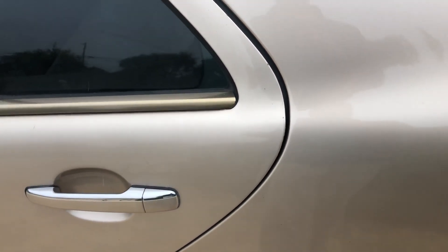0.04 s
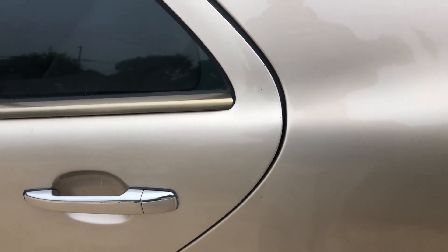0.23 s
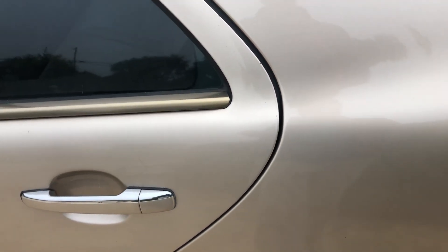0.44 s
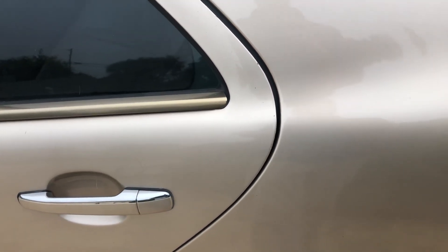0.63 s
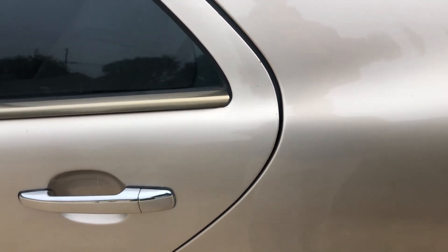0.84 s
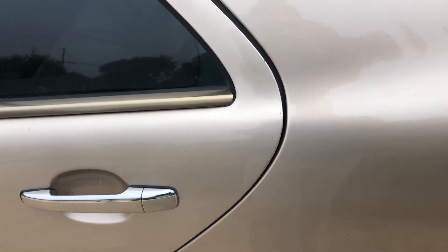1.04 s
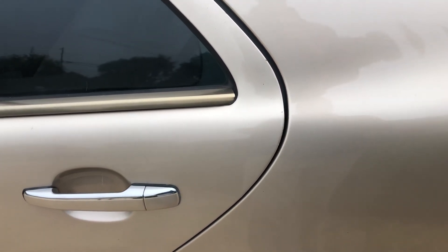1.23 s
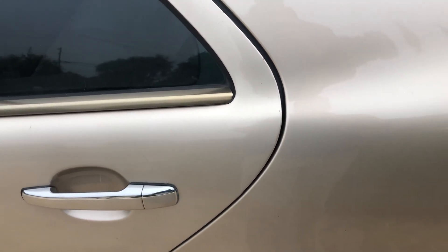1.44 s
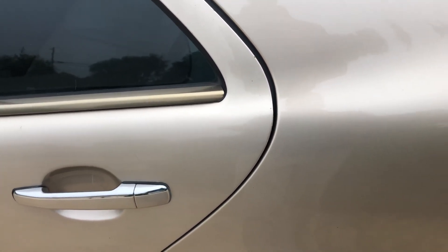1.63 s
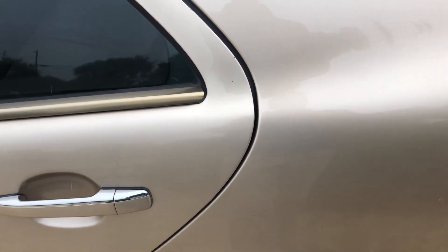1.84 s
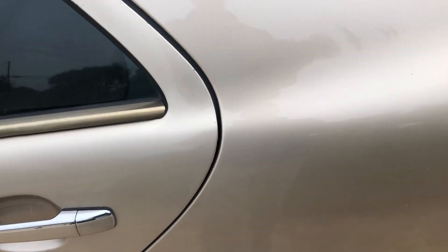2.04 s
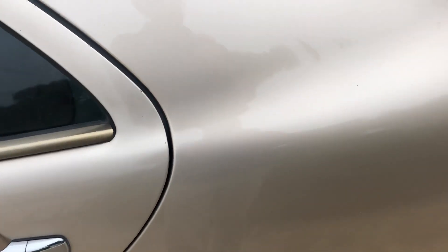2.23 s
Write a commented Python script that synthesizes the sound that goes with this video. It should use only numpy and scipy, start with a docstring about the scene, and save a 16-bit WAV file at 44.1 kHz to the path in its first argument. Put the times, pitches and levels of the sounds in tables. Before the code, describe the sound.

Hard clicking and tapping on a parked car's door trim over very faint distant traffic rumble

```python
"""Faint clicks and scrapes over far traffic rumble, soon a loud sharp click, then more clicks, knocks and taps.
Outdoors beside a parked car, small hard parts (trim, plastic, grit) click and scrape under a hand.
A click, knock or tap is one sharp slip with weak after-slips; a scrape is a dense run of tiny slips.
The slips ring a few stiff modes, and a short echo follows. Traffic and insects are filtered noise:
a rumble and a hiss near 10 kHz. A distant bird whistles two faint gliding tones."""
import sys
import numpy as np
from scipy import signal
from scipy.fft import rfft, irfft, next_fast_len
from scipy.io import wavfile
from scipy.ndimage import map_coordinates

SR = 44100
rng = np.random.default_rng(int(sys.argv[2]) if len(sys.argv) > 2 else 0)


def master_out(mix):
    """Clip the mix to full scale and print it as 16-bit PCM to the path in sys.argv[1]."""
    frames = np.transpose(np.atleast_2d(mix))
    ceiling = np.clip(frames, -1, 1)
    pcm = np.round(ceiling * 32767).astype(np.int16)
    wavfile.write(sys.argv[1], SR, pcm)


def linear_from_db(decibels):
    """Turn decibels (scalar or array-like) into linear amplitude factors; 0 gives 1."""
    return 10 ** (np.asarray(decibels, float) / 20)


N = 101430  # length of the scene in samples

# Colour of traffic and air, before its overall level is set: pitch_hz, relative_level_per_hz_db
AIR_COLOUR = [(28, -55), (50, -1.5), (70, -3), (120, -1), (230, -9.5), (400, -18.5), (800, -23.5),
              (1600, -32.5), (2600, -33), (4500, -36.5), (8000, -42), (15500, -43.5)]
AIR_DB = -57.5
# Bands of a far engine: pitch_hz, half_width_hz, level_db
ENGINE_BANDS = [(96, 14.4, -59.5), (182.6, 9.1, -71)]
INSECT_HZ, INSECT_HALF_WIDTH_HZ, INSECT_DB = 9730, 220, -87
# Notes of a distant bird: start_s, length_s, first_pitch_hz, last_pitch_hz, level_db
BIRD_NOTES = [(1.27, 0.11, 3000, 3170, -83), (1.43, 0.2, 2900, 2810, -81)]
BIRD_OCTAVE_DB = -11

# Soft dull taps: start_s, peak_db, lower_ring_hz, upper_ring_hz
TAPS = [(0.8637, -41, 1340, 2550), (1.374, -46, 730, 1530), (1.7005, -46.5, 1020, 2670)]
TAP_WIDTH_HZ, TAP_UPPER_DB = 200, 3
TAP_TOP_HZ, TAP_TOP_DB = 3920, -7

# Scrapes: start_s, length_s, ring_level_db, main_ring_hz, treble_over_ring_db
SCRAPES = [(0.0, 0.022, -60, 4250, -12), (0.031, 0.081, -63.5, 2950, -13), (0.0707, 0.014, -55.5, 3350, -7),
           (0.1264, 0.0093, -63, 5140, -6), (0.195, 0.22, -56, 4300.0, 2), (0.1986, 0.0084, -54, 6400, 3),
           (0.207, 0.0066, -52, 4300, 2.5), (0.218, 0.008, -42.5, 4110.0, -5), (0.23, 0.11, -55, 2770, -2),
           (0.2306, 0.0049, -35, 4200, -7), (0.2345, 0.003, -37, 2860, -18), (0.2533, 0.015, -48, 3560, -7),
           (0.2654, 0.011, -36, 2900.0, -11), (0.271, 0.0053, -35, 4240, -8),
           (0.2767, 0.0045, -48, 2800, -6), (0.289, 0.0078, -41.5, 2410, -8.5),
           (0.296, 0.017, -52.5, 2710.0, -3), (0.315, 0.0063, -47.5, 2570, -21),
           (0.329, 0.033, -57.5, 2780, -5), (0.3366, 0.0073, -48, 2570, -8.5),
           (0.38, 0.024, -68.5, 2720, -7), (0.406, 0.099, -65.5, 4170, -8.0),
           (0.4134, 0.0085, -54, 4130, -21), (0.425, 0.0059, -54.5, 4340, -6),
           (0.4518, 0.008, -56.5, 4270, 1), (0.4643, 0.0059, -61.5, 4440, 3), (0.485, 0.003, -62, 4170, -5),
           (0.9485, 0.009, -60, 2700, -1), (0.997, 0.05, -68, 2770, -12), (1.1335, 0.0081, -62.5, 2900, -5),
           (1.2292, 0.0073, -60.0, 2650, -4), (1.24, 0.0046, -63, 3700, 2),
           (1.639, 0.013, -64, 2630.0, -26), (1.664, 0.0064, -47, 2630, -2),
           (1.676, 0.017, -60.5, 2650.0, 0), (1.705, 0.033, -56.5, 4240, -10), (1.709, 0.008, -54, 4200, 4),
           (1.718, 0.008, -52, 2980, -7), (1.741, 0.07, -58.5, 4200, -12), (1.772, 0.0074, -50, 2080, 3),
           (1.781, 0.01, -48.5, 4430, -7), (1.796, 0.0039, -70, 4180, -17), (1.809, 0.19, -72, 2560, -13),
           (1.816, 0.0078, -59.5, 2500, -25), (1.8924, 0.0041, -53.5, 4200, -15),
           (2.003, 0.075, -65, 2800, -6), (2.0322, 0.0041, -48, 3340, -0.5),
           (2.1053, 0.0086, -60.5, 5730, 0.5), (2.19, 0.11, -67, 2400, -6.5)]
# Modes of the scraped panel: pitch_hz, width_hz, relative_level_db
SCRAPED_PANEL = [(2650, 450, 5), (4580, 130, -6.5), (5850, 150, -21)]
GRAINS_PER_S, GRAIN_SPREAD_DB = 3500, 3
RISE_SHARE, FALL_DB, RELEASE_S = 0.079, 10.5, 0.00091  # rise and fall count over one scrape length
CLUMPS_PER_S, CLUMP_DB = 237, 4.5
CLUMP_FULL_S = 0.04  # scrapes at least this long break up fully into clumps
SCRAPE_Q, SCRAPE_BODY_DB, SCRAPE_BROAD_DB, SCRAPE_CUT_HZ = 4.7, -8, -4, 2570

# Harder knocks on one part: start_s, ring_peak_db, treble_over_ring_db, after_slips_over_first_db
KNOCKS = [(0.9585, -30, -2, -5), (0.9593, -31, -5.5, -4.5), (1.1959, -26, 0, -6), (1.421, -33, -2, -5.5),
          (1.6247, -29.5, -3.5, -3), (1.7403, -28.5, -3.5, -5.5)]
# Modes of the knocked part: pitch_hz, width_hz, relative_level_db
KNOCKED_PART = [(720, 500, -14), (1600, 1230, -7), (2170, 510, 3), (3150, 510, 0.5), (5000, 1400, -1.5),
                (6940, 1000, -6)]
KNOCK_DIP_HZ, KNOCK_DIP_WIDTH_HZ = 3800, 900

# Clicks: start_s, ring_peak_db, main_ring_hz, treble_over_ring_db, after_slips_over_first_db
CLICKS = [(0.0822, -40.5, 4280, -11, 0.5), (0.1253, -46, 2520, -19, -7), (0.2284, -13, 4250, -7, -9),
          (0.2473, -27.5, 2720, -12, -4), (0.4394, -51, 4170, -28, -19), (0.442, -48, 4260, -26, 3),
          (0.4523, -49, 4330.0, 10.5, -13), (0.479, -50, 3600, -14, -8), (0.492, -52, 4060, -17, -17),
          (0.499, -48.5, 4200, -26, -17), (0.5954, -52.5, 3750, -15, 10), (0.6042, -44.5, 2240, -4, -11),
          (0.6465, -59, 3900, -18, -18), (0.6807, -54.5, 2880, -10, -4), (0.9952, -47, 2650.0, -14, -18),
          (1.0344, -50.5, 3030, -21, -7), (1.0976, -43.5, 2560, -25, -8), (1.142, -52, 2630.0, -12, -13),
          (1.1573, -57, 3360.0, 6, -14.0), (1.2655, -53.5, 3900, -4, 1.5), (1.3564, -54, 4070, -10, -12),
          (1.5703, -36, 2650.0, -9.5, -1.5), (1.575, -35.5, 4170, -4, -12), (1.6623, -36.5, 4220, -8, -21),
          (1.7476, -39, 3870, -15, -7), (1.7662, -47, 2860, 7, 9), (1.7934, -39.5, 4150, -18, 6),
          (1.8875, -43, 4500, -3, 2), (1.9028, -37.5, 5800, -4, -7.5), (1.9643, -47.5, 2500, -12, -6),
          (2.0155, -38, 4360, -5, 2), (2.0179, -34, 5800, -2.5, 3), (2.045, -52, 4390.0, 5, -14.0),
          (2.0614, -50.5, 2950, 10, -3), (2.1322, -53.5, 5620.0, 7, -2), (2.1874, -42, 2030, -5, 5),
          (2.2205, -38.5, 2430, 3, 1)]
# Modes of the clicking part: pitch_hz, width_hz, relative_level_db
CLICKING_PART = [(1890, 1330, -5), (2900, 1540, 2.5), (5300, 2500, -0.5), (6470, 1270, -1.5)]
CLICK_Q, CLICK_BODY_DB, CLICK_BROAD_DB = 4.83, -0.5, -9  # body and broad levels before hardness
HARDNESS_SLOPE = 0.67  # dB of body and broad sound per dB of treble

# Treble snap shared by clicks, knocks and scrapes: pitch_hz, width_hz, relative_level_db
SNAP = [(8300, 3000, 0.5), (10620, 1950, 4), (15900, 7100, -1.5)]
SNAP_SCATTER_DB = 2
AFTER_T60, SNAP_T60 = 0.028, 0.015  # seconds for the after-slips to fall 60 dB: ring, treble
DULL_HZ = 6760  # rings lose treble above this
ECHO_T60, ECHO_DB = 0.04, -17  # seconds to fall 60 dB, and level
TOP_HZ = 15730


def unit(x):
    """Scale to rms 1."""
    return x / np.sqrt(np.mean(x ** 2) + 1e-20)


def top(v):
    """Scale each row to peak 1."""
    return v / np.abs(v).max(axis=1, keepdims=True)


def columns(table):
    """Turn a table into one upright array for each column."""
    return (c[:, None] for c in np.transpose(table))


def wobble(rate):
    """A smooth random curve with rate knots a second."""
    knots = rng.standard_normal(int(N * rate / SR) + 4)
    return map_coordinates(knots, [np.arange(N) * rate / SR])


def filtered(x, response):
    """Filter x along its last axis by a complex response of frequency."""
    n = x.shape[-1]
    m = next_fast_len(n + 2048)
    return irfft(rfft(x, m) * response(np.fft.rfftfreq(m, 1 / SR)), m)[..., :n]


def peak(f, hz, width):
    """One resonance that rings after it is struck; a wider one dies sooner."""
    return 1j * f * width / (hz * hz - f * f + 1j * f * width)


def modes(table):
    """Response of a table of resonances, added with alternating sign."""
    return lambda f: sum((-1) ** k * linear_from_db(db) * peak(f, hz, width)
                         for k, (hz, width, db) in enumerate(table))


def place(s, sound):
    """Add each row of sound at its start time."""
    at = np.round(np.abs(s) * SR).astype(int) + np.arange(sound.shape[1])
    return np.bincount(at.ravel(), sound.ravel(), N + sound.shape[1])[:N]


def noise_band(hz, half_width):
    """Random noise in a narrow bell-shaped band, at rms 1."""
    return unit(filtered(rng.standard_normal(N), lambda f: np.exp(-((f - hz) / half_width) ** 2)))


def traffic():
    """Far traffic and air: broad noise, strongest in the bass."""
    hz, db = np.transpose(AIR_COLOUR)
    colour = lambda f: linear_from_db(np.interp(np.log(f + 1), np.log(hz), db, left=-80))
    return linear_from_db(AIR_DB) * unit(filtered(rng.standard_normal(N), colour))


def engine():
    """A far engine drone: narrow bands of noise, which waver by themselves."""
    return sum(linear_from_db(db) * noise_band(hz, half_width) for hz, half_width, db in ENGINE_BANDS)


def insects():
    """Insect hiss: a narrow band of high noise."""
    return linear_from_db(INSECT_DB) * noise_band(INSECT_HZ, INSECT_HALF_WIDTH_HZ)


def bird():
    """Thin gliding notes, each a sine with a weaker octave, unsteady in pitch and level."""
    t, out = np.arange(N) / SR, 0
    for s, length, first_hz, last_hz, db in BIRD_NOTES:
        progress = np.clip((t - s) / length, 0, 1)
        pitch_hz = first_hz + (last_hz - first_hz) * progress + 35 * wobble(63)
        phase = 2 * np.pi * np.cumsum(pitch_hz) / SR
        swell = np.sqrt(np.abs(np.sin(np.pi * progress))) * linear_from_db(db + 2 * wobble(70))
        tone = np.sin(phase) + linear_from_db(BIRD_OCTAVE_DB) * np.sin(2 * phase)
        out = out + np.sqrt(2) * swell * tone
    return out


def train(after_db):
    """A first slip and a dying train of weaker ones, one row for the ring and a shorter one for the treble."""
    t = np.arange(1000) / SR
    fade = linear_from_db(-60 * t / np.array([[AFTER_T60], [SNAP_T60]]))
    slips = rng.standard_normal((len(after_db), 2, len(t))) * fade
    slips *= linear_from_db(after_db)[:, None] / np.linalg.norm(slips, axis=2, keepdims=True)
    slips[:, :, 0] = 1  # the first slip
    return slips


def ring(slips, hz, q, body, body_db, broad_db):
    """One row of slips wakes the main ring, the body and a broad dry part; the other wakes the treble snap."""
    dull = lambda f: 1 / (1 + 1.4j * f / DULL_HZ - (f / DULL_HZ) ** 2)
    main = lambda f: peak(f, hz, hz / q) ** 2
    whole_body = lambda f: linear_from_db(body_db) * modes(body)(f)
    broad = lambda f: linear_from_db(broad_db) * peak(f, 3060, 3100)
    low = filtered(slips[:, 0], lambda f: dull(f) * (main(f) + whole_body(f) + broad(f)))
    # every event gets a treble colour of its own
    scatter_db = SNAP_SCATTER_DB * rng.standard_normal((len(hz), len(SNAP), 1))
    snap = [(c, width, db + scatter_db[:, k]) for k, (c, width, db) in enumerate(SNAP)]
    high = filtered(slips[:, 1], lambda f: modes(snap)(f) * peak(f, 14400, 15200))
    return low, high


def taps():
    """Soft contact: two short rings and a weak third, with the treble dulled."""
    s, db, low_hz, high_hz = columns(TAPS)
    rings = modes([(low_hz, TAP_WIDTH_HZ, 0), (high_hz, TAP_WIDTH_HZ, TAP_UPPER_DB),
                   (TAP_TOP_HZ, 2 * TAP_WIDTH_HZ, TAP_TOP_DB)])
    soft = lambda f: rings(f) / (1 + 1j * f / TAP_TOP_HZ) ** 2
    slips = train(np.full(s.shape, -9.0))[:, 0]
    return place(s, linear_from_db(db) * top(filtered(slips, soft)))


def scrapes():
    """Dense uneven slips under a quick rise, a sagging hold and a short release."""
    s, length, db, hz, treble_db = columns(SCRAPES)
    t = np.arange(4800) / SR  # longer scrapes stop at the end of this span
    shape = (len(s), 2, len(t))
    happens = rng.random(shape) < GRAINS_PER_S / SR
    slips = happens * rng.standard_normal(shape) * linear_from_db(GRAIN_SPREAD_DB * rng.standard_normal(shape))

    rise = np.clip(t / (RISE_SHARE * length), 0, 1)
    sag = linear_from_db(-FALL_DB * t / length)
    release = np.exp(-np.clip(t - length, 0, None) / RELEASE_S)
    clump_db = CLUMP_DB * np.clip(length / CLUMP_FULL_S, 0, 1)
    clumps = linear_from_db(clump_db * np.array([wobble(CLUMPS_PER_S)[:len(t)] for _ in s]))
    stroke = rise * sag * release * clumps

    low, high = ring(slips * stroke[:, None], hz, SCRAPE_Q, SCRAPED_PANEL, SCRAPE_BODY_DB, SCRAPE_BROAD_DB)
    thin = lambda f: ((1j * f / SCRAPE_CUT_HZ) ** 2  # takes away the bass
                      / (1 + 1.2j * f / SCRAPE_CUT_HZ - (f / SCRAPE_CUT_HZ) ** 2))
    low = filtered(low, thin)
    # even out the energy per second of listed length, so the levels hold
    low, high = (v / np.sqrt((v ** 2).sum(axis=1, keepdims=True) / (length * SR)) for v in (low, high))
    return place(s, linear_from_db(db) * (low + linear_from_db(treble_db) * high))


def knocks():
    """Every knock rings the same modes of one part, with a treble snap."""
    s, db, treble_db, after_db = columns(KNOCKS)
    slips = train(after_db)
    # little sounds between the part's low and high modes
    dip = lambda f: 1 - peak(f, KNOCK_DIP_HZ, KNOCK_DIP_WIDTH_HZ)
    low = filtered(slips[:, 0], lambda f: modes(KNOCKED_PART)(f) * dip(f))
    high = filtered(slips[:, 1], modes(SNAP))
    return place(s, linear_from_db(db) * (top(low) + linear_from_db(treble_db) * top(high)))


def clicks():
    """Sharp slips, each with a main ring of its own on top of the part's shared modes."""
    s, db, hz, treble_db, after_db = columns(CLICKS)
    hard_db = HARDNESS_SLOPE * treble_db  # bright, hard contacts wake more of the part
    low, high = ring(train(after_db), hz, CLICK_Q, CLICKING_PART,
                     CLICK_BODY_DB + hard_db, CLICK_BROAD_DB + hard_db)
    return place(s, linear_from_db(db) * (top(low) + linear_from_db(treble_db) * top(high)))


def echo(near):
    """A short answer from car and ground: the sound smeared by a quickly fading noise tail."""
    t = np.arange(SR // 8) / SR
    tail = rng.standard_normal(len(t)) * linear_from_db(-60 * t / ECHO_T60)
    return linear_from_db(ECHO_DB) * signal.fftconvolve(near, tail / np.linalg.norm(tail))[:N]


def scene():
    """Add the far background to the near sounds and their echo, in one channel."""
    background = traffic() + engine() + insects() + bird()
    near = taps() + scrapes() + knocks() + clicks()
    return (background + near + echo(near))[None]


def top_cut(x):
    """Nothing passes above the cut-off."""
    return signal.sosfilt(signal.butter(12, 16960, fs=SR, output="sos"), x)


def record(dry):
    """A phone's band limit: a very steep fall above TOP_HZ."""
    mix = filtered(dry, lambda f: 1 / np.sqrt(1 + (f / TOP_HZ) ** 150))
    return top_cut(mix)


dry = scene()
out = record(dry)
master_out(out)
```